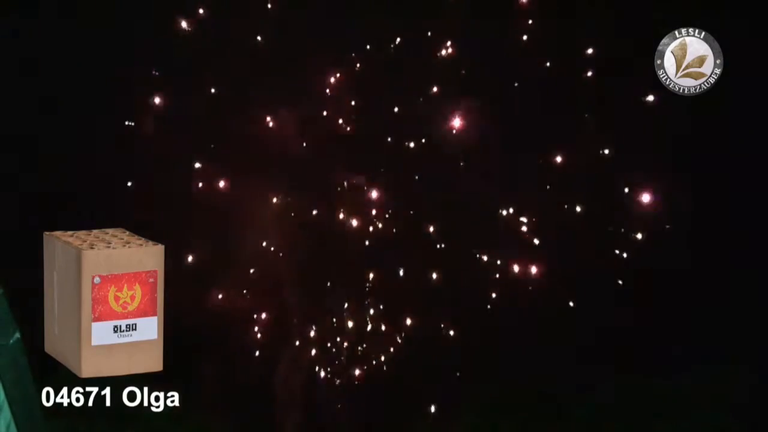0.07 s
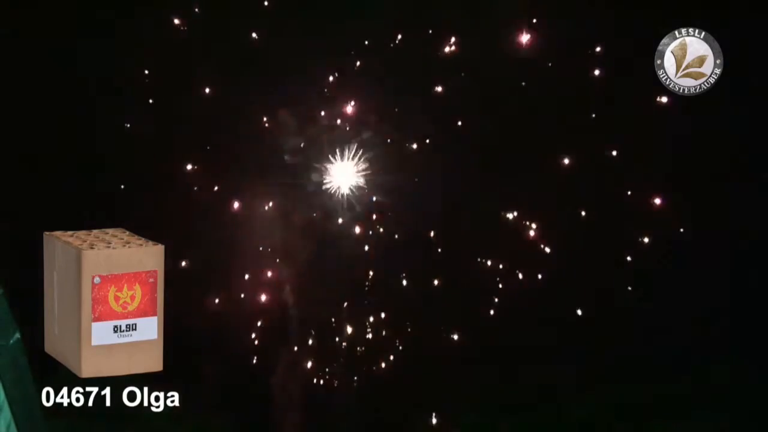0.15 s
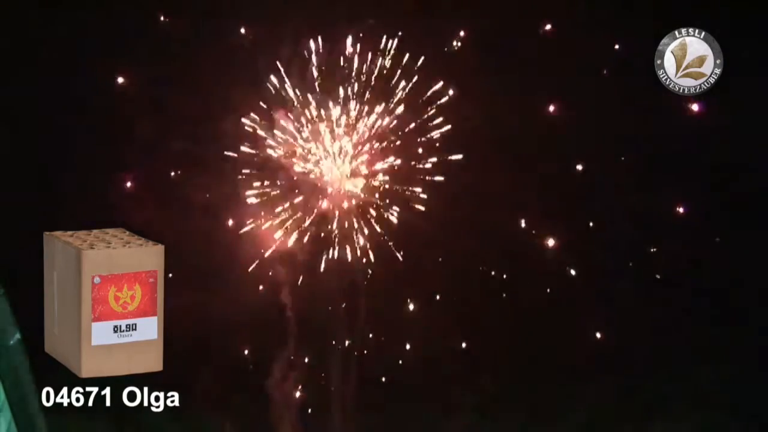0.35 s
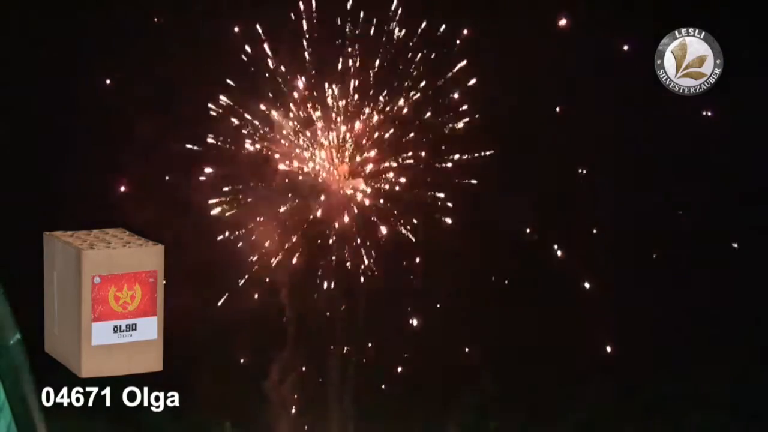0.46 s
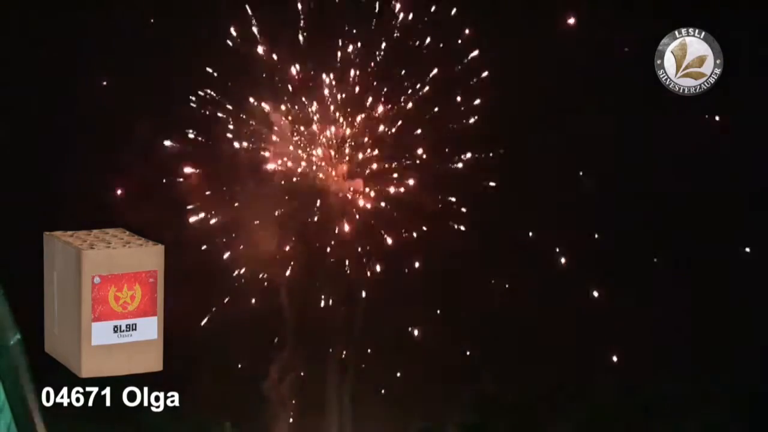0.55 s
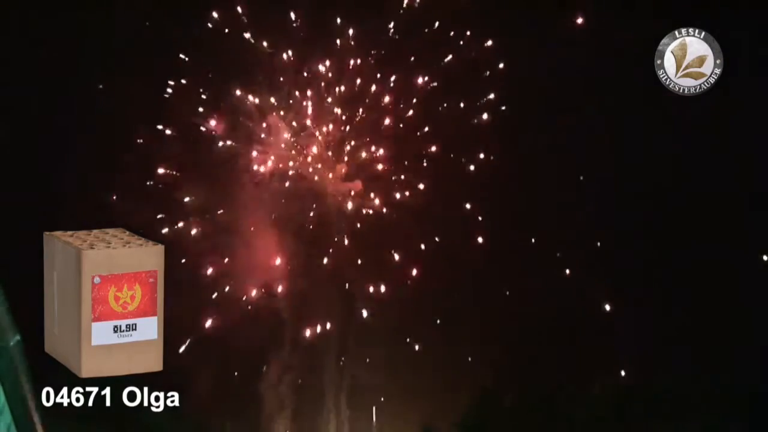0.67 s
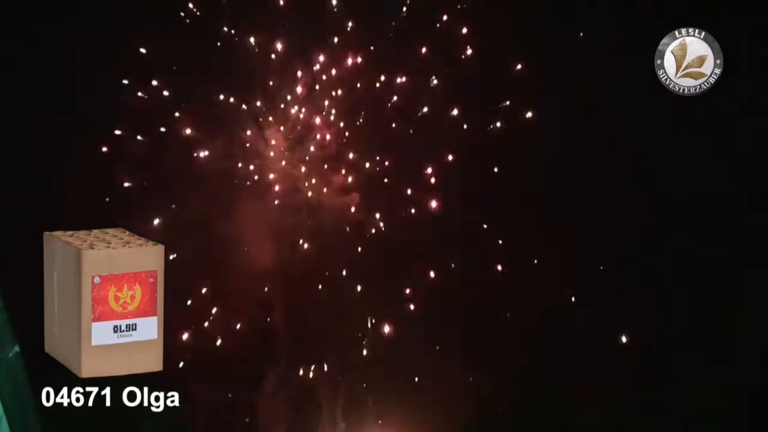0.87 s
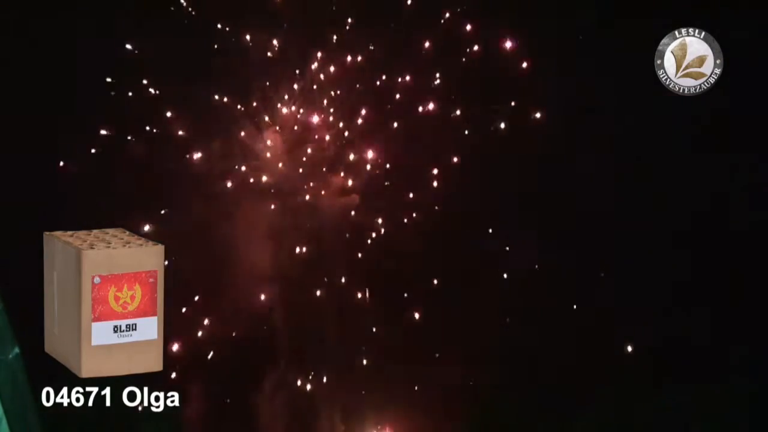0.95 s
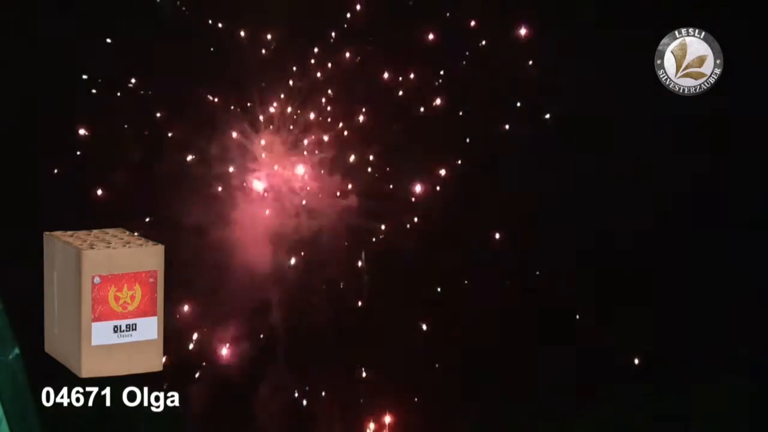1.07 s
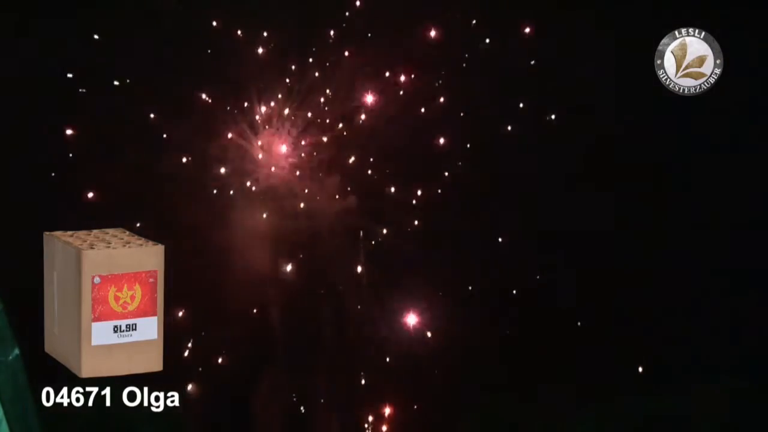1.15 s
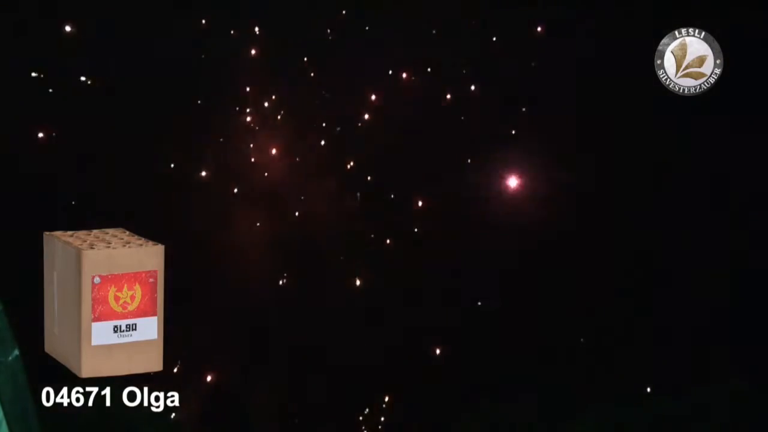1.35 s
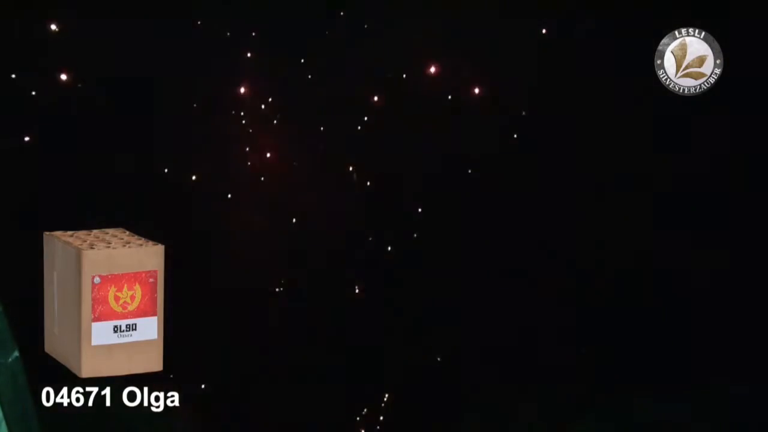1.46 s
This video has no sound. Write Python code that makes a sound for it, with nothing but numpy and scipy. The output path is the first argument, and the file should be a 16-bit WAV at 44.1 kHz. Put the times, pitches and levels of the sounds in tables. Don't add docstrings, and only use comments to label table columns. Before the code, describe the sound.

One sharp firework explosion close by, slapping off walls and rumbling away outdoors into soft sizzling

```python
import sys
import numpy as np
from scipy import signal
from scipy.io import wavfile
from scipy.ndimage import uniform_filter1d

SR = 44100
rng = np.random.default_rng(int(sys.argv[2]) if len(sys.argv) > 2 else 0)


def ratio(d):
    e = np.asarray(d, float) / 20
    return 10 ** e


def inscribe(sig):
    pcm = np.round(np.clip(np.atleast_2d(sig).T, -1, 1) * 32767)
    wavfile.write(sys.argv[1], SR, pcm.astype(np.int16))


N = 66150


def blasts(table):
    sideways_db = 2
    t, out = np.arange(N) / SR, np.zeros((2, N))
    leans = rng.uniform(-1, 1, len(table))
    for (start, peak_db, push_ms, rise_ms, polarity), lean in zip(table, leans):
        ms = np.maximum(t - start, 0) * 1000
        rise = 1 - np.exp(-(ms / rise_ms) ** 2)
        wave = rise * (1 - ms / push_ms) * np.exp(-ms / push_ms)
        gain = ratio(peak_db + sideways_db * lean * np.array([[1], [-1]]))
        out += polarity * gain * wave / wave.max()
    return out


# t/s, peak level/dB, push length/ms, rise/ms, polarity/1
FRONTS = [(.2435, -11, .5, .2, -1), (.2450, 6, .6, .22, -1), (.2463, -3, .45, .2, -1),
          (.2475, -3, 2.6, .5, -1), (.2494, -9, .6, .2, -1), (.2504, -6, 2.3, 1, 1),
          (.2611, -7, 1.4, .2, 1), (.2625, 17, .58, .1, -1), (.2641, 9, 5, .07, -1),
          (.2663, -6, .35, .1, 1), (.2696, -4, 1.3, .4, 1), (.2716, 5, 1.4, .3, 1), (.2768, 1, 1, .06, 1),
          (.2789, 0, .6, .06, 1), (.2824, 0, 1.5, .3, 1), (.2859, 1, 1.3, .1, 1), (.2893, -2, 1.4, .4, 1)]


def fronts():
    return blasts(FRONTS)


# t/s, peak level/dB, push length/ms, rise/ms, polarity/1
SLAPS = [
    (.3098, -5, 1.6, .4, 1),
    (.4535, -5, 1.4, .4, 1),
    (.4583, -6, 1.1, .3, 1),
    (.4768, -5, 1.1, .3, -1),
    (.6484, -11, .7, .2, 1),
    (.6518, -9, 1.4, .5, 1),
    (.6664, -12, 1.2, .4, -1),
]


def slaps():
    cut_hz = 250
    return signal.lfilter(*signal.butter(1, cut_hz, "high", fs=SR), blasts(SLAPS))


def ring(start, hz, db, t60):
    after = np.maximum(np.arange(N) / SR - start, 0)
    return -ratio(db - 60 * after / t60) * np.sin(2 * np.pi * hz * after)


def tube_pop():
    return ring(.2389, hz=900, db=-7, t60=.012)


def ground_and_yard():
    thump = ring(0.2, hz=46.4, db=-21, t60=.1)
    yard = ring(.287, hz=285, db=-8, t60=.2)
    left_db = 4.5
    return (thump + yard) * ratio([[left_db], [-left_db]])


def evened(x):
    return x / np.sqrt(np.mean(x ** 2) + 1e-20)


def swell(start, db, rise_s, t60):
    after = np.maximum(np.arange(N) / SR - start, 0)
    return (1 - np.exp(-after / rise_s)) * ratio(db - 60 * after / t60)


# t/s, level/dB
SCATTER = [
    (.2420, -24.5),
    (0.2448, -14),
    (0.255, -22),
    (0.267, -10),
    (0.2772, -8),
    (0.2868, -13.5),
]


def scatter():
    same, low_hz, high_hz = 0.25, 620, 3320
    size = ratio(2.5 * np.minimum(rng.exponential(1, (2, N)), 5))
    a, b = size * rng.standard_normal((2, N))
    mid, side = np.sqrt(1 + same) * a, np.sqrt(1 - same) * b
    x = np.array([mid + side, mid - side])
    x = signal.lfilter(*signal.butter(1, [low_hz, high_hz], "band", fs=SR), x)
    return evened(x) * sum(swell(t, db, rise_s=0.00057, t60=0.043) for t, db in SCATTER)


def read(points, hz):
    f, value = np.transpose(points)
    return np.interp(np.log(hz + 1), np.log(f + 1), value)


def grid():
    hz, t, _ = signal.stft(np.zeros(N), SR, nperseg=1024, noverlap=768)
    return hz[:, None], t[None]


def patches(hz, t, bins, frames):
    x = rng.standard_normal((hz.size, t.size))
    x = uniform_filter1d(x, size=bins, axis=0)
    return evened(uniform_filter1d(x, size=frames, axis=1))


def pair(x, same, db):
    z = signal.stft(x, SR, nperseg=1024, noverlap=768)[2]
    same = np.clip(same, -.99, .99)
    mid = np.sqrt((1 + same) / 2) * z[0]
    side = np.sqrt((1 - same) / 2) * z[1]
    coloured = np.array([mid + side, mid - side]) * ratio(db)
    return signal.istft(coloured, SR, nperseg=1024, noverlap=768)[1][:, :N]


# f/Hz, level per Hz/dB
NEAR = [(25, -39.5), (165, -5), (450, -3.5), (900, -11), (2000, -16), (5000, -24), (9000, -27.5),
        (15600, -43.5)]
# f/Hz, level per Hz/dB
FAR = [(25, -31), (130, -9), (500, -7), (800, -14), (2000, -20), (6000, -32.5), (15600, -68)]
# f/Hz, correlation/1
SAME = [(60, 0.28), (180, 0.7), (550, 0.79), (1650, 0.73), (4970, 0.62), (15000, -0.29)]
# f/Hz, left-right level/dB
LEFT_DB = [(100, 1), (600, 3.5), (2000, 2), (8000, 1)]


def echoes(start):
    echoes_per_s, spread_db, patchy_db = 9000, 2.5, 0.63
    far_s = 0.29
    size = ratio(spread_db * np.minimum(rng.exponential(1, (2, N)), 5))
    present = rng.random((2, N)) < echoes_per_s / SR
    taps = size * rng.choice([-1., 1.], (2, N)) * present
    hz, t = grid()
    far = 1 - np.exp(-np.maximum(t - start - .2, 0) / far_s)
    db = (1 - far) * read(NEAR, hz) + far * read(FAR, hz)
    db = db + patchy_db * patches(hz, t, bins=8, frames=5)
    lean = read(LEFT_DB, hz) / 2
    return evened(pair(taps, read(SAME, hz), np.array([db + lean, db - lean])))


# t/s, level/dB
ROLL = [
    (.2385, -30),
    (.256, -21),
    (.268, -22),
    (.284, -15),
    (.33, -16),
    (.45, -17),
    (.64, -23),
    (.98, -36),
    (1.5, -43),
]


def roll():
    t = np.arange(N) / SR
    s, db = np.transpose(ROLL)
    now = ratio(np.interp(t, s, db)) * (t > s[0]) * echoes(s[0])
    earlier = ratio(-36 - 9.5 * t)
    facade = swell(.642, db=-19, rise_s=0.009, t60=0.16)
    return now + (earlier + facade) * echoes(-.8)


# f/Hz, level per Hz/dB
HISS = [(300, 7), (1500, -3), (4000, -2.5), (8000, 4), (12000, -4), (15700, -7)]


def stars():
    same, level_db, fade_db_per_s = 0.1, -46, -4
    hz, t = grid()
    db = read(HISS, hz) + fade_db_per_s * t + .7 * patches(hz, t, bins=40, frames=12)
    hiss = evened(pair(rng.standard_normal((2, N)), same, db))
    flare = swell(0.232, db=7.5, rise_s=0.04, t60=2.2)
    return ratio(level_db) * hiss * (1 + flare)


def scene():
    shot = fronts() + slaps() + tube_pop() + ground_and_yard()
    return shot + scatter() + roll() + stars()


def band_limit(x):
    return signal.sosfilt(signal.butter(12, 15770, fs=SR, output="sos"), x)


def record(dry):
    ceiling_db, duck_from_db, duck_share = .5, -17, .5
    duck_s, recover_db_per_s = .02, 30
    bass_cut_hz, edge_hz = 35, 15780
    top = ratio(ceiling_db)
    x = np.clip(dry, -top, top)
    r = np.exp(-1 / (duck_s * SR))
    power = signal.lfilter([1 - r], [1, -r], (x ** 2).mean(0))
    power_db = 10 * np.log10(power + 1e-12)
    fall = np.arange(N) * recover_db_per_s / SR
    held_db = np.maximum.accumulate(power_db + fall) - fall
    over_db = np.maximum(held_db - duck_from_db, 0)
    x = x / ratio(duck_share * over_db)
    x = signal.lfilter(*signal.butter(1, bass_cut_hz, "high", fs=SR), x)
    low_pass = signal.firwin(511, edge_hz, window=("kaiser", 9), fs=SR)
    x = signal.oaconvolve(x, low_pass[None], "same")
    return band_limit(np.clip(x, -1, 1))


dry = scene()
out = record(dry)
inscribe(out)
```